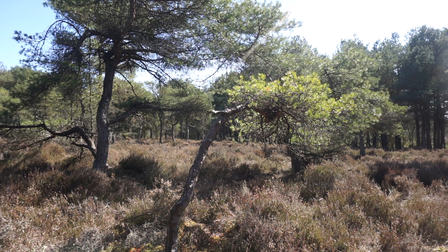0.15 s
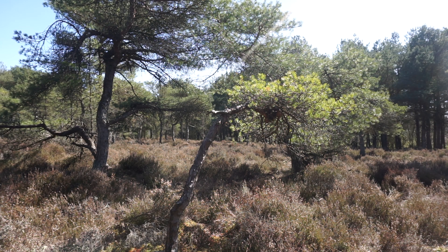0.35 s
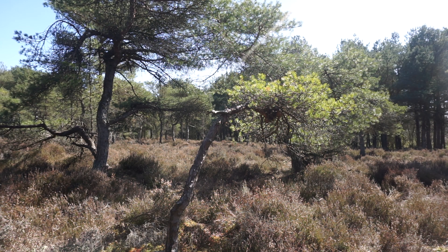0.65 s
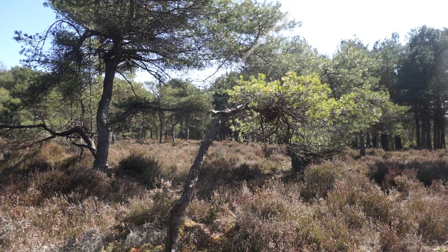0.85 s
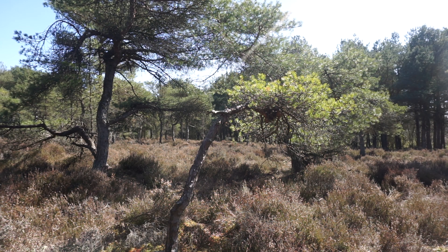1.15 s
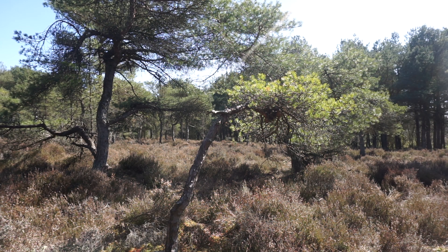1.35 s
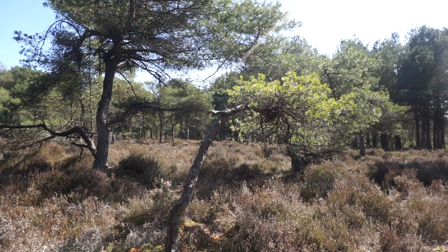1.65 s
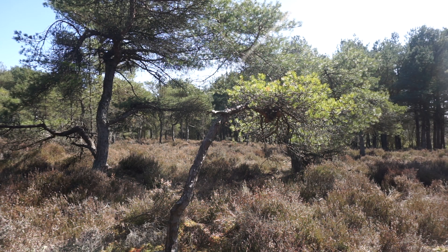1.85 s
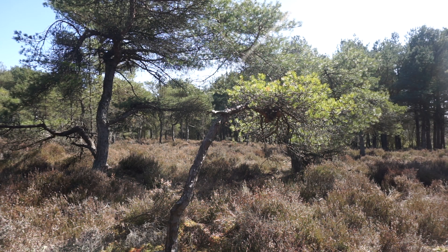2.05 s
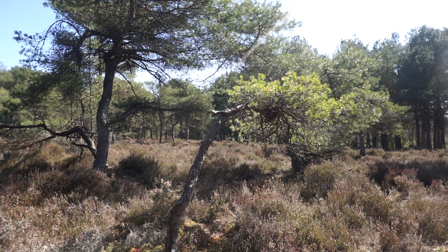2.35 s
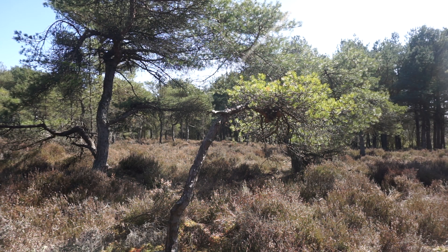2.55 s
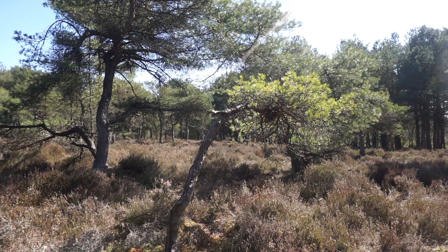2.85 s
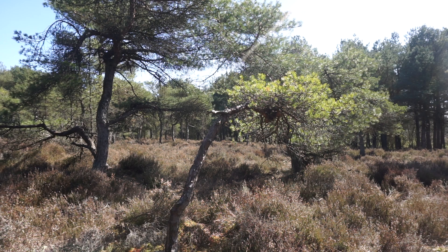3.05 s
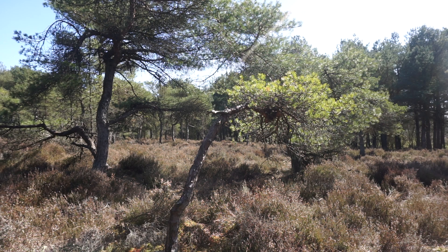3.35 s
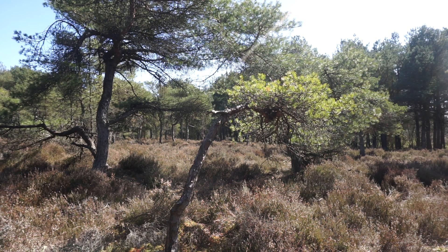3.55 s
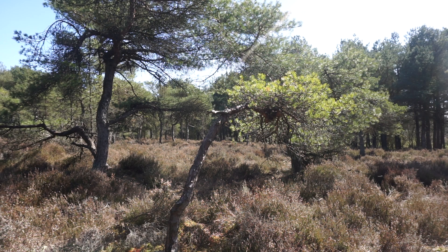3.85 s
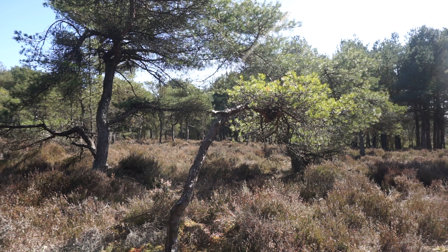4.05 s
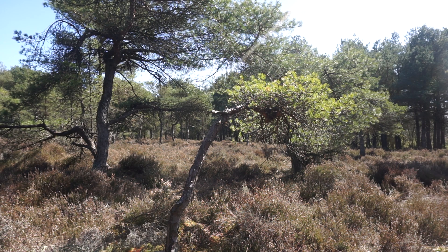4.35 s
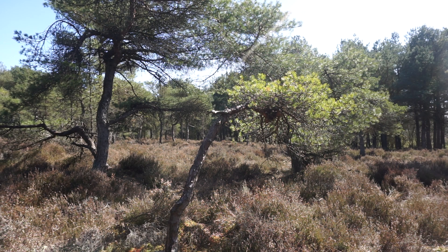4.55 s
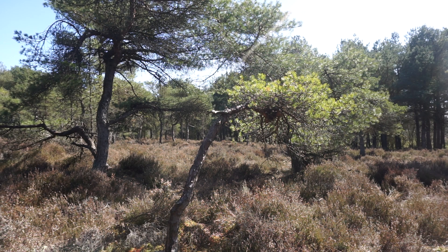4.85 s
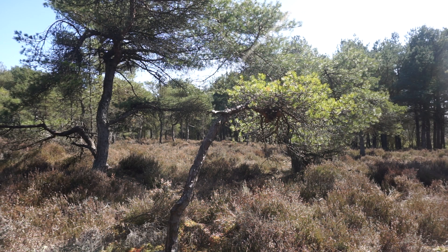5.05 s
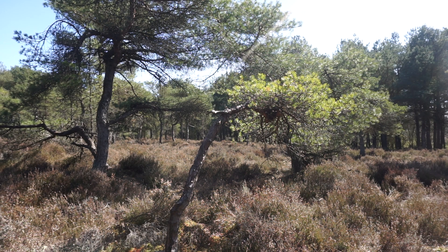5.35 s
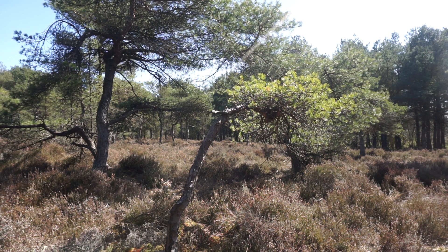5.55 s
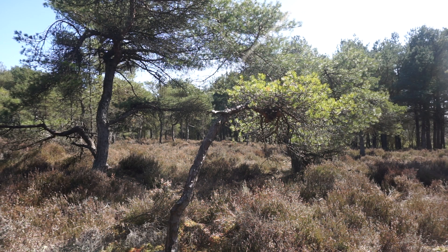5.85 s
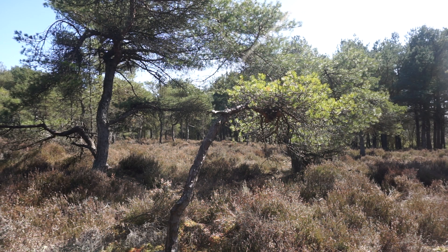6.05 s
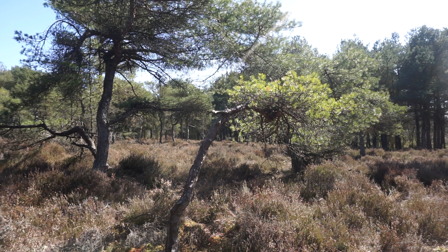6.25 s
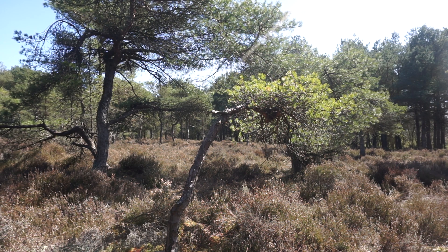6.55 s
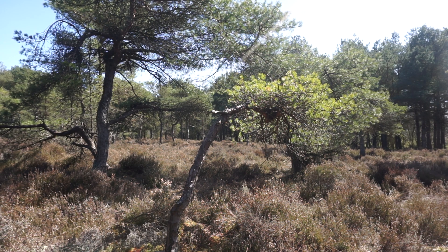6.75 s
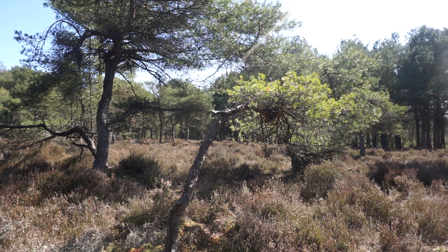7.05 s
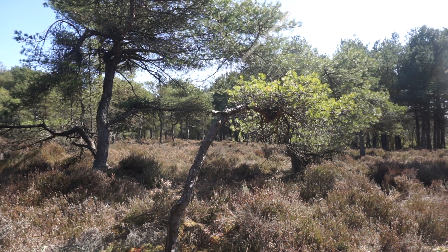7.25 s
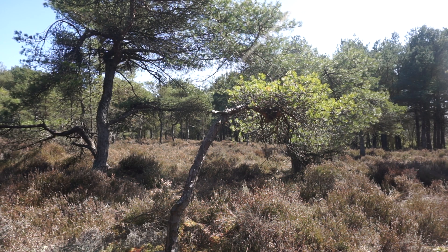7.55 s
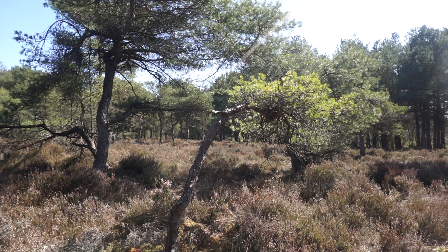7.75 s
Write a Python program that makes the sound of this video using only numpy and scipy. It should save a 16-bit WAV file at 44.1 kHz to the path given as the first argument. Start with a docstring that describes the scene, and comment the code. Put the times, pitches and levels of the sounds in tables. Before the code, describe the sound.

Outdoors on a heath with scattered pines, a soft steady hush of trees lies under everything, with a faint camera hum, a very thin high electric whine and occasional dull ticks, around 1.3-1.5, 6 and 7.5 seconds. From 0.4 to 2.8 seconds a tit on the left see-saws: rising slur, falling slur, roughly 0.3 seconds apart, each led by a tiny chip. From 1.1 to 3.0 a robin-like singer on the right gives high wavering notes, a rapid trill of upstrokes, then slower liquid slurs, with a crisp trunk echo. Faint burry warbles come from deep in the wood, mainly at 0.3-0.6 and 1.9-3.2. Between 3.2 and 4.4 it is nearly empty: hush, a weak rasp, small low wind puffs. From 4.45 the tit returns stronger, see-sawing until about 7.7 and weakening at the end, while distant lower whistles and hoarse rasps sound from 5 onward.

```python
"""A tit see-saws on the left of a heath with scattered pines; a robin-like singer runs one thin phrase
on the right, and fainter birds whistle, rasp and warble further off. Bird notes are near sines that follow
pitch tables, rasps are narrow noise, and sparse random echoes scatter both among the trunks. Under them lie
the hush of the trees (shaped noise), a few puffs of wind (low noise), and the camera's hum (narrow noise),
ticks (dying cosines) and high whine (a throbbing sine in a little noise)."""
import sys
import numpy as np
from scipy import signal
from scipy.fft import rfft, irfft, next_fast_len
from scipy.io import wavfile
from scipy.ndimage import uniform_filter1d

SR = 44100
rng = np.random.default_rng(int(sys.argv[2]) if len(sys.argv) > 2 else 0)


def master_out(mix):
    """Clip the mix to full scale and print it as 16-bit PCM to the path in sys.argv[1]."""
    frames = np.transpose(np.atleast_2d(mix))
    ceiling = np.clip(frames, -1, 1)
    pcm = np.round(ceiling * 32767).astype(np.int16)
    wavfile.write(sys.argv[1], SR, pcm)


N = 348831  # length in samples


def gain_of(db):
    """Decibels to amplitude."""
    return 10 ** (np.asarray(db) / 20)


def evened(x):
    """Scales to an rms (average strength) of 1."""
    return x / np.sqrt(np.mean(x ** 2) + 1e-20)


def read(points, hz):
    """Reads a table of (Hz, value) along a log-frequency axis."""
    f, value = np.transpose(points)
    return np.interp(np.log(hz + 1), np.log(f + 1), value)


def add(mix, s, sound):
    """Mixes a sound in at s seconds."""
    part = mix[round(s * SR):][:len(sound)]
    part += sound[:len(part)]


def wobble(size, span):
    """Smooth chance that changes over about span samples, rms about 1."""
    smooth = signal.oaconvolve(rng.standard_normal(size + 400), np.hanning(span), "same")
    return evened(smooth)[200:200 + size]


def band_noise(hz, width_hz, size):
    """Noise around one frequency: slow noise spun up to that pitch; two unrelated rows, rms 1."""
    a, b = rng.standard_normal((2, 2, size))
    r = np.exp(-np.pi * width_hz / SR)
    slow = signal.lfilter([1], [1, -2 * r, r * r], a + 1j * b)
    carrier = np.exp(2j * np.pi * hz * np.arange(size) / SR)
    return evened((slow * carrier).real)


def place(x, left_db, lag):
    """Pans a source: the far channel is quieter; lag = samples by which left trails right."""
    size = next_fast_len(N)
    delay = np.exp(-2j * np.pi * lag * np.fft.rfftfreq(size))
    late = irfft(rfft(x, size) * delay, size)[:N]
    return np.array([late * gain_of(min(left_db, 0)), x * gain_of(min(-left_db, 0))])


def whistle(rows, flutter_db, octave_db, cut_s=0.0011, low_octave_db=-90):
    """A bird's voice organ: a near sine that follows the pitch and wavers in level, with a weak octave."""
    s, hz, db = np.transpose(rows)
    t = np.arange(s[0], s[-1], 1 / SR)
    pitch = np.interp(t, s, hz)
    angle = 2 * np.pi * (np.cumsum(pitch) / SR + rng.random())
    flutter = wobble(len(t), span=300)
    # the octave is stronger on high notes and, for some voices, at the low feet of sweeps
    low = gain_of(low_octave_db) * np.clip((4800 - pitch) / 1500, 0, 1)
    octave = gain_of(octave_db + 0.0043 * (pitch - 6000)) + low
    tone = np.sin(angle) + octave * np.sin(2 * angle)
    # a quick cut ends in a snap
    edges = np.minimum(np.minimum((t - s[0]) / 0.00028, (s[-1] - t) / cut_s), 1)
    level = gain_of(np.interp(t, s, db) + flutter_db * flutter)
    return np.sqrt(2) * tone * edges * level


def trees(x, near_t60, low_t60, high_t60, far_db):
    """Sparse echoes of random sign, other ones each side: quick scatter from near twigs, a slow tail
    from the wood; each t60 is the seconds a 60 dB fade takes."""
    taps = np.zeros((2, SR))
    at = np.arange(0, SR - 20, 20) + rng.integers(0, 20, (2, (SR - 1) // 20))
    np.put_along_axis(taps, at, rng.choice([-1., 1.], at.shape), 1)
    hz, t, z = signal.stft(taps, SR, nperseg=256)
    t60 = read([(3000, low_t60), (8000, high_t60)], hz)[:, None]  # treble dies first
    far = gain_of(far_db - 60 * t / t60)
    near = gain_of(-60 * t / near_t60)
    tail = signal.istft(z * np.hypot(far, near), SR, nperseg=256)[1][:, :SR]
    tail *= np.minimum(np.arange(SR) / SR / 0.0041, 1)  # the scatter builds up over 4.1 ms
    return signal.fftconvolve(x[None], tail / np.linalg.norm(tail[0]), axes=1)[:, :N]


def hush():
    """Hush of trees and microphone: random short-time spectra with drifting patches and one slow swell."""
    # Tone colour of the hush. Each row: frequency in Hz, relative level in dB per Hz.
    colour = [(25, -25), (60, -19), (125, -15.5), (250, -7.5), (450, 0.5), (1000, 1), (1600, -2),
              (3000, -4.5), (6000, -8), (10000, -8.5), (16000, -7.5)]
    # How alike the two sides are. Each row: frequency in Hz, left-right likeness from -1 to 1.
    likeness = [(60, 0.51), (180, 0.23), (550, -0.078), (1650, -0.41), (4970, -0.0058), (15000, -0.18)]
    # Balance of the two sides. Each row: frequency in Hz, left minus right in dB.
    lean = [(60, -2), (240, 0.5), (950, 2), (3770, 0), (15000, 0)]
    frames, hz = N // 256 + 5, np.fft.rfftfreq(1024, 1 / SR)
    a, b, c, d, patches = rng.standard_normal((frames, 513, 5)).T
    patches = evened(uniform_filter1d(uniform_filter1d(patches, 12, 0), 14, 1))
    swell = evened(uniform_filter1d(rng.standard_normal(frames), 60))
    same = np.clip(read(likeness, hz), -1, 1)[:, None]
    left = a + 1j * b
    right = same * left + np.sqrt(1 - same ** 2) * (c + 1j * d)
    z = np.array([left, right])
    z *= gain_of(read(colour, hz)[:, None] + 1.17 * patches + 0.85 * swell)
    z *= gain_of(np.multiply.outer([.5, -.5], read(lean, hz)))[:, :, None]
    noise = signal.istft(z, nperseg=1024, noverlap=768)[1][:, :N]
    return gain_of(-59) * evened(noise)  # overall level in dB


def camera():
    """Fuzzy hum of the body (narrow noise), dull ticks (dying cosines), and an electric whine that throbs."""
    # Hum of the body. Each row: centre in Hz, width in Hz, left level in dB, left minus right in dB.
    hums = [(697.6, 35.4, -70, 4.5), (1286, 71, -73.5, 0.5)]
    # Dull ticks. Each row: start in seconds, level in dB (about the peak on the right).
    tick_times = [(0.908, -50), (1.308, -40.5), (1.541, -43), (5.959, -43), (6.591, -64), (7.095, -49),
                  (7.561, -44.5)]
    whine_hz, beat_hz = 12947, 59.5
    t = np.arange(N) / SR
    hum = sum(gain_of([[db], [db - left_db]]) * band_noise(hz, width_hz, N)
              for hz, width_hz, db, left_db in hums)
    throb = 1 + 1.0 * np.cos(2 * np.pi * (beat_hz * t + rng.random()))
    whine = gain_of(-66.5) * throb * np.sin(2 * np.pi * whine_hz * t)
    whine += gain_of(-74.5) * band_noise(12950, 300, N)[0]
    ticks, u = np.zeros(N), np.arange(400) / SR
    for s, db in tick_times:
        add(ticks, s, gain_of(db) * np.cos(2 * np.pi * 800 * u + 0.46) * np.exp(-u / 0.00074))
    return hum + place(whine, left_db=-20, lag=0) + place(ticks, left_db=-4, lag=0)


def chatter(start, end, hz, spread_hz, glide_hz, db):
    """Rows of faint notes at a loose pace and chance pitch."""
    gap_s, note_s = .045, .04
    s = np.arange(start, end, gap_s)
    late, off, loud = rng.uniform(-1, 1, (16, 3))[:len(s)].T
    first = hz + spread_hz * off
    return list(zip(s + .02 * late, note_s + 0 * s, first, first + glide_hz, db + 3.6 * loud))


def warbler():
    """Quick burry notes from deep in the wood: fluttering whistles with more scatter than direct sound."""
    # Distant burry notes. Each row: start in seconds, length in seconds, first pitch in Hz, last pitch in Hz,
    # level in dB before fading, panning and scatter.
    notes = [(0.25, 0.096, 3640, 3773, -59), (0.293, 0.076, 3480, 3290, -57),
             (0.373, 0.13, 3717, 3508, -49.5), (0.424, .14, 3350, 3210, -59),
             (0.502, 0.066, 3650, 3500, -55), (0.792, .06, 7630, 7820, -60),
             (0.885, 0.042, 7000, 7800, -58), (.934, 0.084, 7840, 8960, -62),
             (0.98, 0.037, 7660, 7670, -57.5), (1.058, .055, 6880, 8470, -58.5),
             (1.105, .045, 7000, 7040, -58), (1.909, .06, 4000, 3310, -49),
             (2.055, 0.061, 4100, 3300, -43.5), (2.101, .055, 3500, 2880, -51),
             (2.171, 0.052, 3600, 3274, -45), (2.26, 0.042, 3040, 2850, -54),
             (2.327, .038, 4400, 3640, -42.5), (2.386, 0.045, 4150, 3750, -48),
             (2.428, .036, 3500, 3420, -52), (2.492, .07, 4200, 3414, -46), (2.553, 0.046, 3070, 3020, -53),
             (2.627, 0.077, 3050, 2880, -57.5), (6.348, .11, 2890, 2610, -58.5)]
    # Fainter chatter, notes left to chance. Each row: from and to in seconds, middle of the first pitches in Hz,
    # their spread in Hz, glide in Hz, middle level in dB before fading, panning and scatter.
    bouts = [(2.72, 3.25, 3300, 500, -250, -64)]
    bend_share, bend_done = 0.373, .6  # shares of the time and of the glide: it is quickest at first
    song = np.zeros(N)
    for s, length, from_hz, to_hz, db in notes + sum((chatter(*bout) for bout in bouts), []):
        bend = (bend_share * length, from_hz + bend_done * (to_hz - from_hz), db)
        note = whistle([(0, from_hz, db), bend, (length, to_hz, db)], flutter_db=5.5, octave_db=-62)
        burr = 1 + .5 * wobble(len(note), span=120)  # spreads the tone
        add(song, s, note * burr * np.hanning(len(note)))
    wood = trees(song, .15, .9, .3, far_db=-4)
    return place(gain_of(-3.5) * song, left_db=11, lag=6.6) + gain_of([[-4], [-10]]) * wood


def far_birds():
    """Distant whistles (near sines) and rasps (narrow noise), blurred by the trees."""
    # All levels here are before panning and scatter.
    # Plain whistles. Each row: start in seconds, length in seconds, first pitch in Hz, last pitch in Hz,
    # peak level in dB.
    plain_whistles = [(5.02, 0.13, 2192, 2160, -65), (5.65, 0.1, 2190, 2045, -60),
                      (5.821, 0.13, 2305, 2145, -54), (6.283, 0.094, 2290, 2210, -52.5),
                      (6.743, 0.045, 1940, 1800, -53), (7.161, .19, 2170, 2292, -57),
                      (7.401, 0.19, 2361, 2305, -52), (7.597, 0.18, 2303, 2274, -67)]
    # Arched calls, one list each. Each row: time in seconds, pitch in Hz, level in dB.
    arched_calls = [
        [(1.14, 2130, -54), (1.164, 2390, -60), (1.23, 2590, -61), (1.309, 2310, -60.5), (1.5, 1955, -55.5),
         (1.83, 1640, -64.5), (1.85, 1660, -85)],
        [(6.4, 2184, -49), (6.478, 2620, -51.5), (6.509, 2540, -50.5), (6.541, 2230, -44.5), (6.59, 1930, -56)],
    ]
    # Faint hoarse rasps. Each row: middle in seconds, length in seconds, centre in Hz, width in Hz, level in dB.
    rasps = [(0.494, 0.33, 1486, 410, -57.5), (1.102, 0.31, 701.4, 300, -59), (3.682, 0.23, 1358, 300, -62),
             (5.967, 0.35, 1880, 700, -58.5), (6.56, 0.36, 1402, 644, -53), (6.699, 0.81, 2163, 704, -61)]
    # each plain whistle swells to its peak, then fades
    swell_share, swell_db, fade_db = 0.52, -9, -8.5
    song = np.zeros(N)
    plain = []
    for s, length, from_hz, to_hz, db in plain_whistles:
        peak = (s + swell_share * length, from_hz + swell_share * (to_hz - from_hz), db)
        plain.append([(s, from_hz, db + swell_db), peak, (s + length, to_hz, db + fade_db)])
    for rows in arched_calls + plain:
        add(song, rows[0][0], whistle(rows, flutter_db=3.5, octave_db=-36))
    for s, length, hz, width_hz, db in rasps:
        size = round(length * SR)
        rasp = band_noise(hz, width_hz, size)[0] * np.hanning(size)
        add(song, s - length / 2, gain_of(db) * rasp)
    wood = trees(song, 0.078, 1.0, 0.53, far_db=-6.0)
    return place(gain_of(-3.0) * song, left_db=26, lag=10.3) + gain_of([[-8], [-11]]) * wood


def tit():
    """Chip, rising slur, chip, falling slur; an echo off a near branch cuts dips in the slurs."""
    # Shapes of the notes: rising slur, falling slur, chip, opening note.
    # Each row: seconds from the note's start, pitch in Hz, level in dB (slurs: pitch and time before scaling).
    rise = [(0, 3282, -31.5), (.02, 3690, -15.5), (.045, 3925, -9.5), (.075, 4314, -2), (.105, 4534, -2),
            (.14, 4910, -2), (.158, 4990, -1), (.183, 5165, -3), (.198, 5240, -16)]
    fall = [(0, 4450, -12.5), (.007, 5144, -2), (.024, 5074, 2.5), (.065, 4938, 2), (.1, 4773, 1),
            (.135, 4386, -4.5), (.165, 4155, -9), (.19, 4280, -21)]
    chip_shape = [(0, 4500, -6), (.002, 5200, 0), (.006, 7500, -14), (.009, 7300, -14), (.012, 5100, 0),
                  (.016, 4800, -7)]
    opening = [(0, 5450, -15.5), (.03, 5150, -1), (.062, 4940, -3), (.075, 4880, -5)]
    # Rising slurs. Each row: start in seconds, level in dB, pitch factor, length factor.
    rises = [(0.573, -46, 1.016, 0.9), (1.147, -43, 0.97, 0.95), (1.732, -40.5, 0.98, 1.035),
             (2.316, -41, .98, 0.9), (4.628, -43, 1.015, 0.96), (5.202, -35, 0.98, 0.96),
             (5.782, -36, 0.977, 1.036), (6.369, -36.5, 0.98, 0.91), (6.961, -39, 0.96, 0.94),
             (7.54, -53, 0.93, 0.77)]
    # Falling slurs, all of one length. Each row: start in seconds, level in dB, pitch factor.
    falls = [(.855, -43, 1.003), (1.441, -42, .99), (2.03, -42.5, 1.015), (2.612, -44.5, .99),
             (4.919, -36, .99), (5.492, -34.5, .99), (6.076, -34, .999), (6.655, -34.5, 1),
             (7.244, -45.5, 1)]
    # The short falling note that opens each song. Each row: start in seconds, level in dB.
    openings = [(0.371, -50.5), (4.448, -45.5)]
    # a soft chip before every slur: seconds ahead of it, level in dB before a slur of -40 dB
    chip_rise, chip_fall = (0.039, -54.5), (.013, -59)
    chip_follows = 0.66  # how much of the slur's level change, in dB, the chip follows
    song, scattered = np.zeros((2, N))
    slurs = [(rise, chip_rise, *row) for row in rises]
    slurs += [(fall, chip_fall, *row, 1) for row in falls]
    for shape, (lead_s, chip_db), s, db, pitch, length in slurs:
        note = whistle(np.multiply(shape, [length, pitch, 1]), flutter_db=1.1, octave_db=-50)
        add(song, s, gain_of(db) * note)
        # turning away dims the direct sound most
        add(scattered, s, gain_of(db - 0.72 * (db + 34.5)) * note)
        chip = whistle(chip_shape, flutter_db=1.5, octave_db=-50)
        chip = gain_of(chip_db + chip_follows * (db + 40)) * chip
        add(song, s - lead_s, chip)
        add(scattered, s - lead_s, gain_of(13) * chip)
    for s, db in openings:
        note = gain_of(db) * whistle(opening, flutter_db=2.5, octave_db=-50)
        add(song, s, note)
        add(scattered, s, note)
    song += 0.16 * np.roll(song, round(.00276 * SR))  # the branch echo
    wood = trees(scattered, 0.091, 1.0, 0.074, far_db=-11.0)
    return place(song, left_db=8.5, lag=-0.027) + gain_of([[-11], [-13]]) * wood


def stroke(s, length, foot_hz, shelf_hz, top_hz, reach, leave, db, flick_db):
    """Pitch and level of one upstroke: flick up to a shelf, rest there, climb on."""
    foot_db, climb_db, top_db = -22.5, -9.5, -5  # relative to the shelf
    left_hz = shelf_hz * 1.03  # the shelf leans up
    return [(s, foot_hz, db + foot_db),
            (s + reach / 2, (foot_hz + shelf_hz) / 2, flick_db),
            (s + reach, shelf_hz, db),
            (s + leave, left_hz, db),
            (s + (leave + length) / 2, (left_hz + top_hz) / 2, db + climb_db),
            (s + length, top_hz, db + top_db)]


def slur(foot_hz, drop_hz, held):
    """A held note with a quick scoop before it and a drop after it."""
    scoop_s, scoop_db, drop_s, drop_db = .009, -12, .011, -22.5
    (s0, _, db0), (s1, _, db1) = held[0], held[-1]
    return [(s0 - scoop_s, foot_hz, db0 + scoop_db), *held, (s1 + drop_s, drop_hz, db1 + drop_db)]


def right_singer():
    """High wavering notes, a trill of upstrokes, then lower slurs; one trunk throws a clear echo."""
    # All levels here are before panning, echo and scatter.
    # Upstrokes. Each row: start in seconds, length in seconds, foot, shelf and top pitch in Hz, seconds until
    # the shelf is reached, seconds until it is left, shelf level in dB, level halfway up the flick in dB.
    strokes = [(1.5, .031, 5600, 7500, 9300, .007, .022, -30, -42),
               (1.575, .028, 4700, 7600, 9200, .009, .016, -30, -40),
               (1.638, .028, 5860, 7400, 8700, .011, .014, -27, -37),
               (1.702, .028, 5900, 7300, 8960, .013, .016, -26, -36),
               (1.77, .028, 6000, 7300, 8800, .012, .015, -24, -34),
               (1.838, .026, 6000, 7450, 9060, .009, .013, -24.5, -38),
               (1.905, .026, 6100, 7250, 8930, .008, .012, -26, -34),
               (1.992, .042, 2720, 5350, 7220, .021, .03, -27, -25),
               (2.088, .04, 2930, 5200, 6670, .015, .027, -29.5, -36)]
    # Held notes. Each row: pitch scooped up or down from in Hz, last pitch in Hz, then a list of points,
    # each with time in seconds, pitch in Hz, level in dB.
    slurs = [ (9000, 8400, [(1.14, 8840, -60), (1.166, 8610, -40.5), (1.24, 8490, -39.5),
             (1.256, 8320, -37)]), (6910, 8800, [(1.287, 8140, -38.5), (1.304, 8450, -28)]),
             (8880, 8400, [(1.32, 7960, -32), (1.33, 8280, -33)]), (8100, 6000, [(1.353, 8330, -50),
             (1.388, 8960, -47), (1.418, 8370, -25.5), (1.424, 8040, -31), (1.439, 7990, -31.5)]),
             (3730, 3200, [(2.192, 5620, -30), (2.218, 5237, -30.5), (2.265, 5300, -28.5),
             (2.297, 5570, -23.5), (2.306, 5690, -27.5)]), (5360, 5000, [(2.392, 7430, -32),
             (2.427, 7180, -29.5), (2.443, 6830, -36.5), (2.452, 6220, -35.5), (2.492, 6170, -29)]),
             (5710, 6500, [(2.588, 7600, -34), (2.623, 7620, -25), (2.668, 7080, -29.5), (2.674, 6830, -36),
             (2.69, 6960, -27), (2.7, 6700, -41), (2.711, 6830, -33), (2.721, 6590, -31)]),
             (7210, 7050, [(2.758, 7700, -32.5), (2.766, 7330, -36), (2.778, 7180, -34)]),
             (7930, 7000, [(2.775, 8120, -44), (2.79, 8250, -43), (2.825, 7780, -32)]),
             (3010, 5870, [(2.871, 7780, -37.5), (2.915, 7530, -30.5), (2.949, 7090, -34.5),
             (3.003, 6700, -41)]), ]
    song = np.zeros(N)
    for rows in [stroke(*row) for row in strokes] + [slur(*row) for row in slurs]:
        note = whistle(rows, flutter_db=1.2, octave_db=-35, cut_s=.00008, low_octave_db=-13)
        add(song, rows[0][0], note)
    song += gain_of(-15) * np.roll(song, round(0.012 * SR))  # the trunk's echo
    wood = trees(song, 0.13, 1.0, 0.71, far_db=-12.5)
    return place(song, left_db=-5, lag=1.79) + gain_of([[-15], [-13]]) * wood


def wind():
    """Puffs on the microphones: low lumpy noise that swells and fades, partly shared by both sides."""
    # Puffs. Each row: middle in seconds, length in seconds, centre in Hz, level in dB of each side's
    # own noise at the middle.
    puffs = [(3.78, 0.029, 120, -73), (3.949, 0.21, 59.8, -86), (4.262, 0.12, 104.1, -70.5),
             (4.37, 0.13, 60.1, -78), (7.072, 0.1, 67.6, -84), (7.336, .04, 81.3, -71),
             (7.464, 0.054, 59, -76), (7.562, 0.044, 59.5, -78)]
    t, out = np.arange(N) / SR, np.zeros((2, N))
    for s, length, hz, db in puffs:
        near = slice(round((s - 2 * length) * SR), round((s + 2 * length) * SR))
        puff = band_noise(hz, 0.91 * hz, len(t[near]))
        swell = np.exp(-((t[near] - s) / length * 2) ** 2)
        out[:, near] += gain_of(db) * swell * (puff + 0.4 * puff[::-1])  # [::-1] swaps the sides
    return out


def scene():
    """All sources, left and right."""
    return tit() + right_singer() + far_birds() + warbler() + hush() + wind() + camera()


def record(dry):
    """The band limit of the recorder: a steep filter removes what lies above its edge."""
    edge_hz = 15880
    low_pass = signal.firwin(1023, edge_hz, window=("kaiser", 9), fs=SR)
    return signal.oaconvolve(dry, low_pass[None], "same")


dry = scene()
out = record(dry)
master_out(out)
```